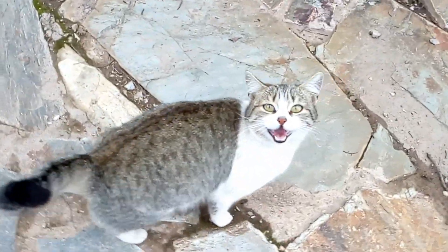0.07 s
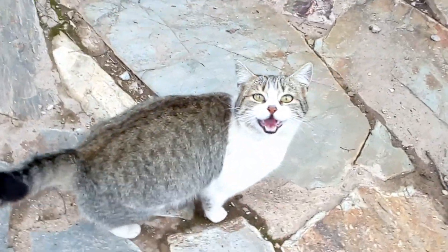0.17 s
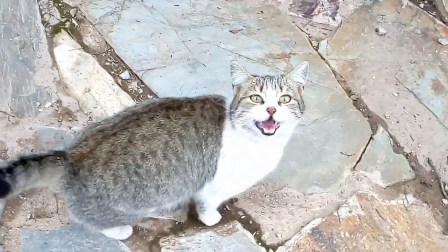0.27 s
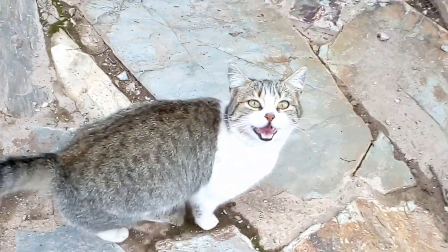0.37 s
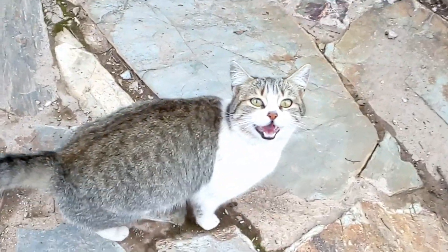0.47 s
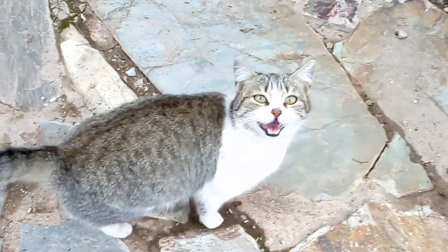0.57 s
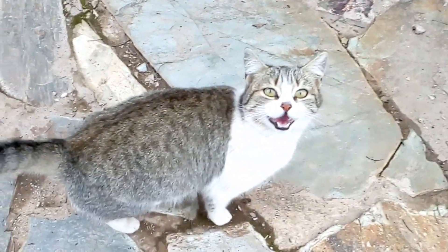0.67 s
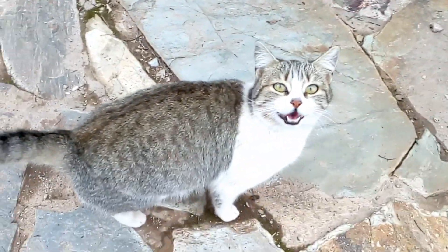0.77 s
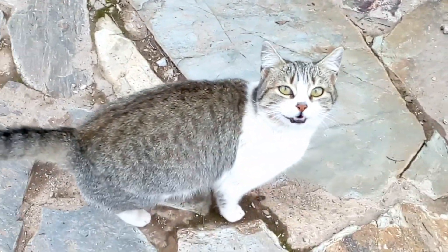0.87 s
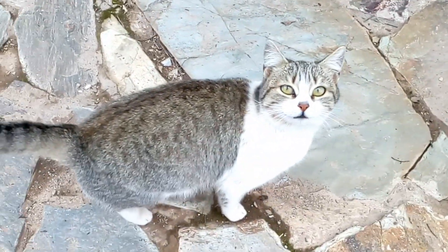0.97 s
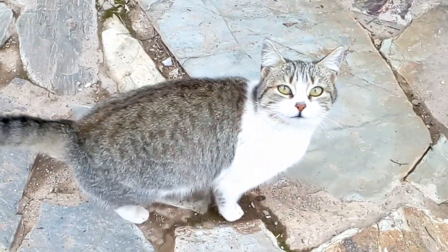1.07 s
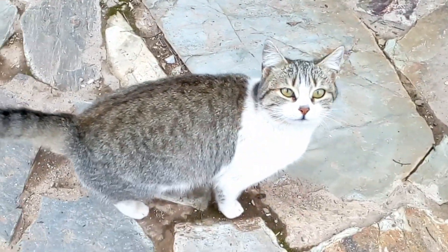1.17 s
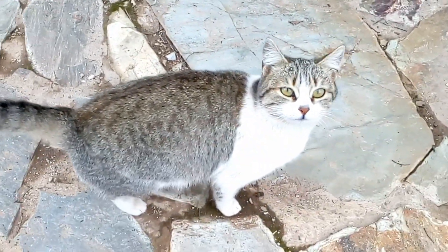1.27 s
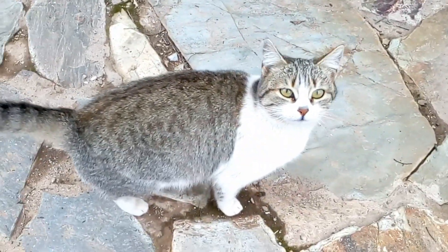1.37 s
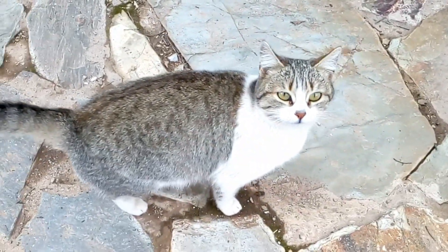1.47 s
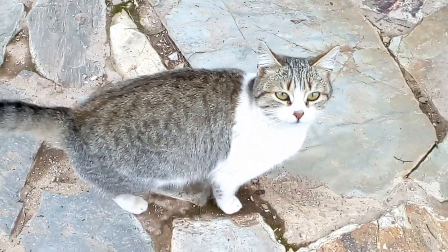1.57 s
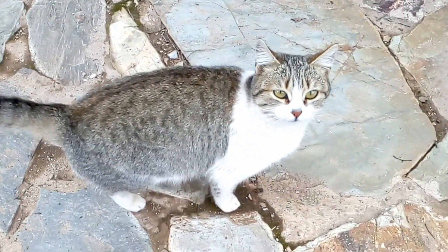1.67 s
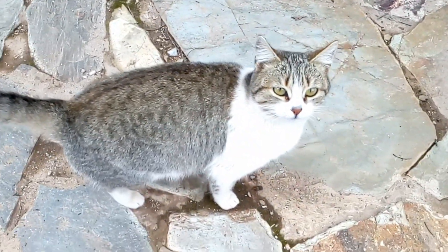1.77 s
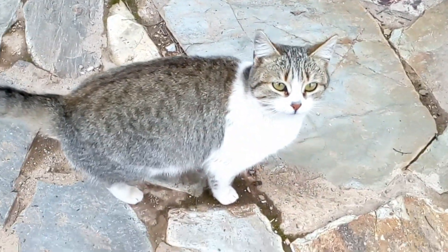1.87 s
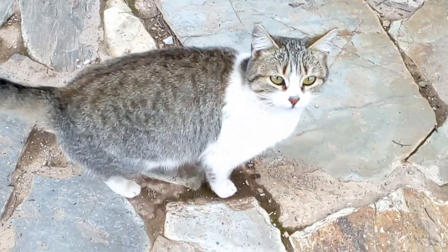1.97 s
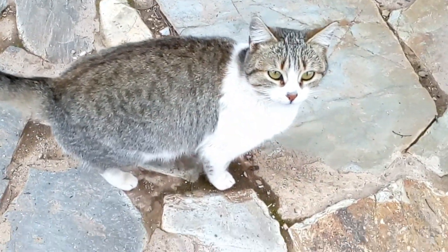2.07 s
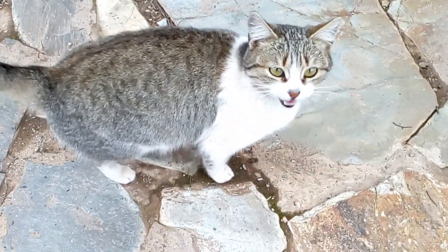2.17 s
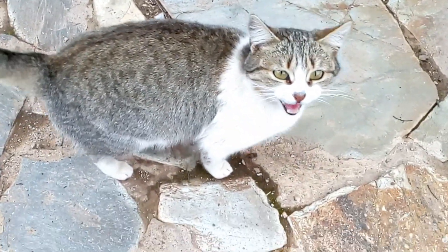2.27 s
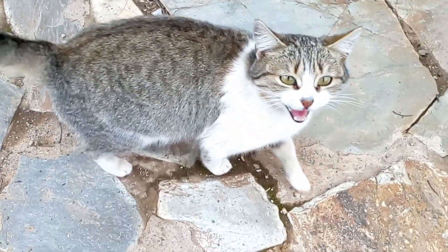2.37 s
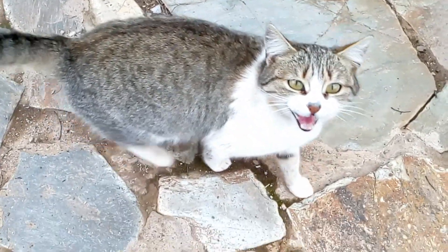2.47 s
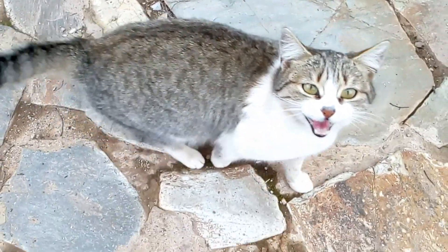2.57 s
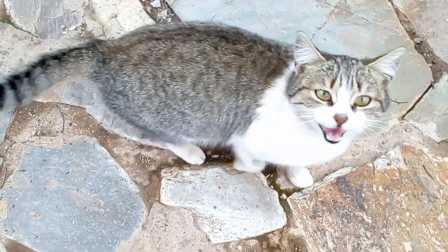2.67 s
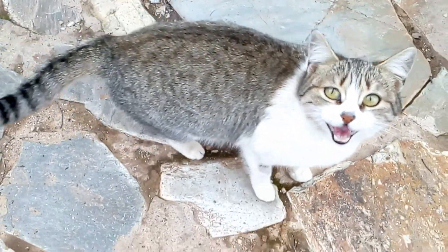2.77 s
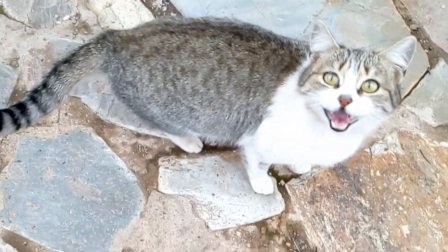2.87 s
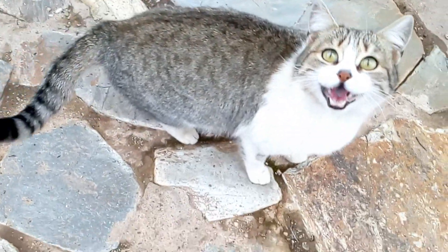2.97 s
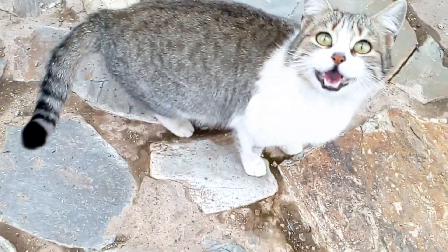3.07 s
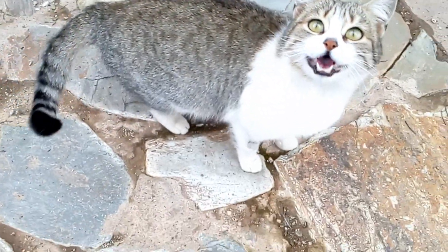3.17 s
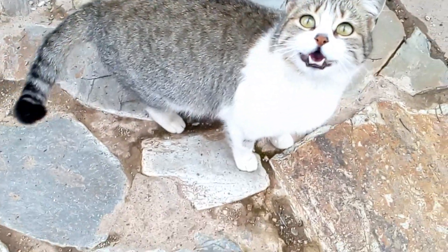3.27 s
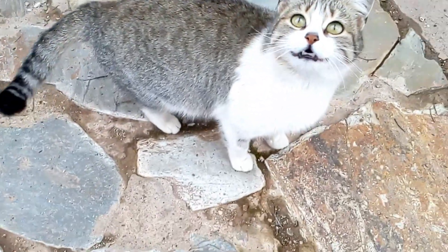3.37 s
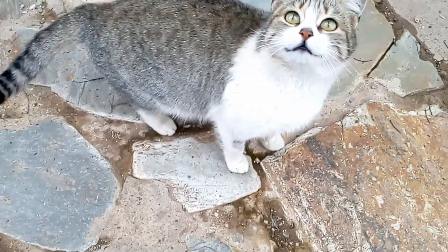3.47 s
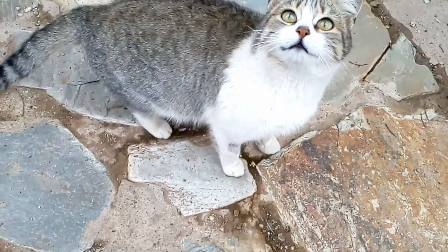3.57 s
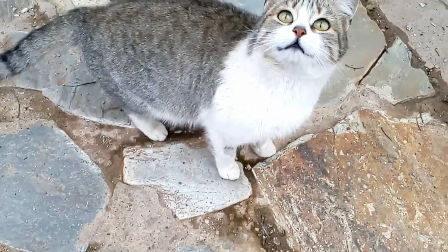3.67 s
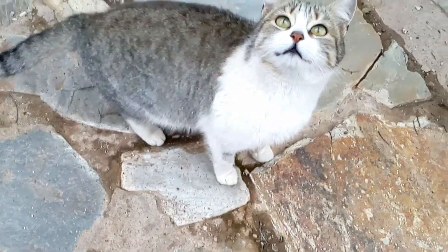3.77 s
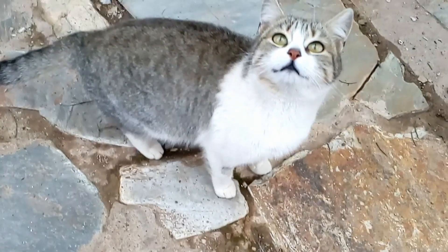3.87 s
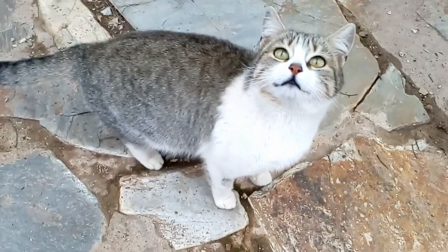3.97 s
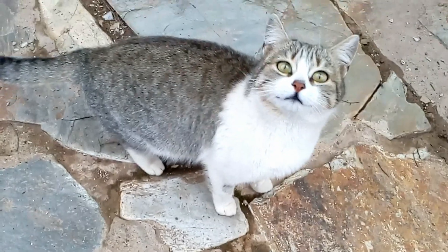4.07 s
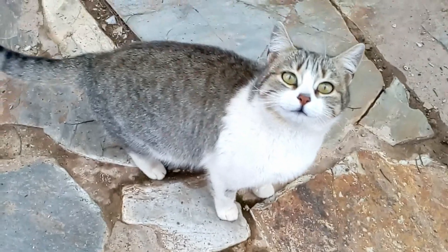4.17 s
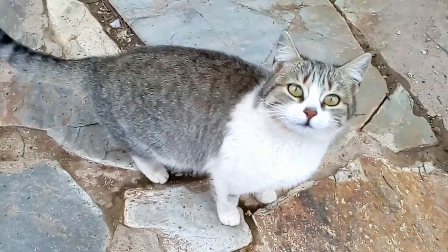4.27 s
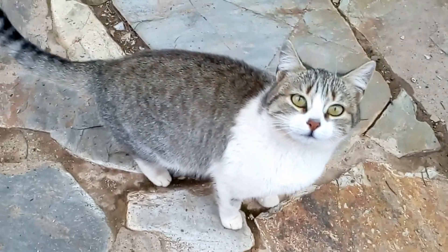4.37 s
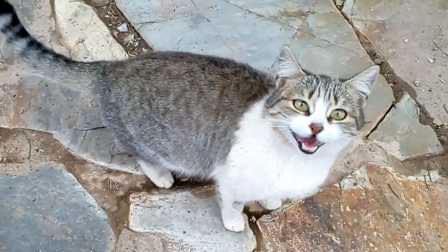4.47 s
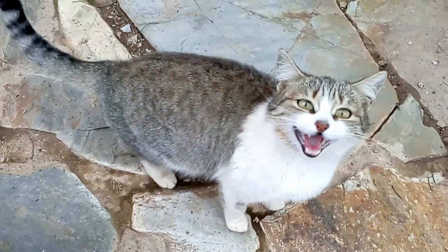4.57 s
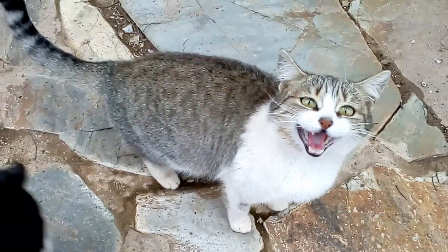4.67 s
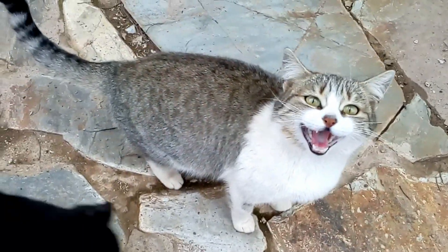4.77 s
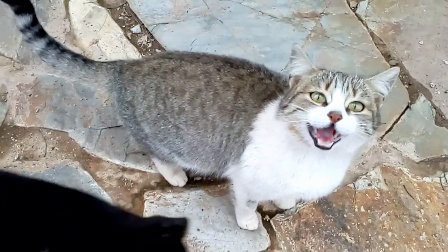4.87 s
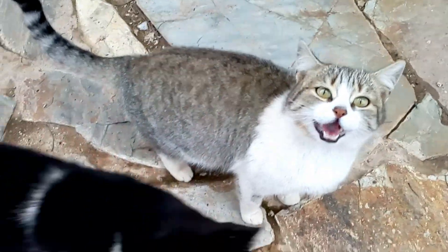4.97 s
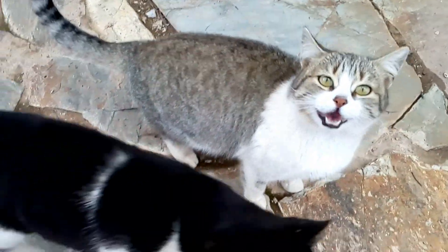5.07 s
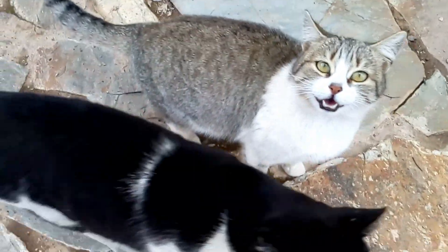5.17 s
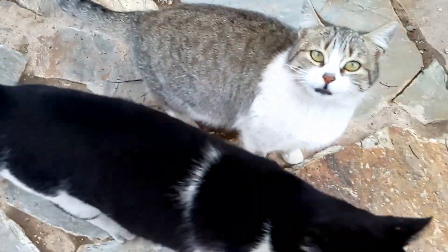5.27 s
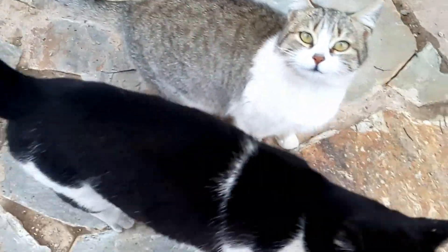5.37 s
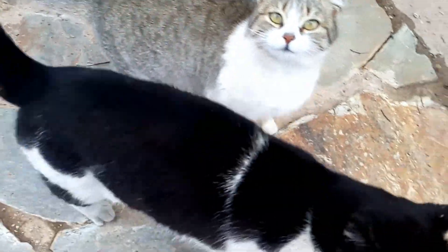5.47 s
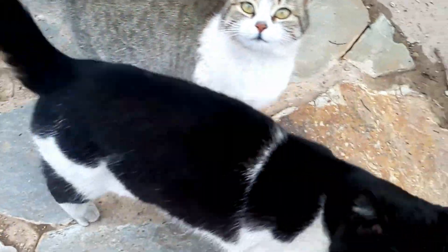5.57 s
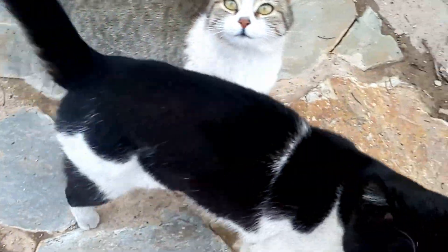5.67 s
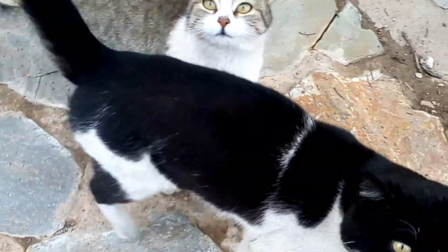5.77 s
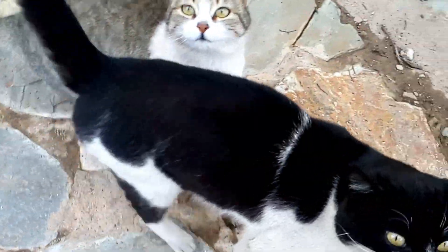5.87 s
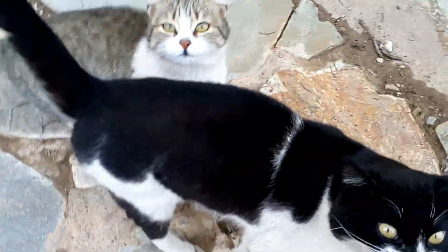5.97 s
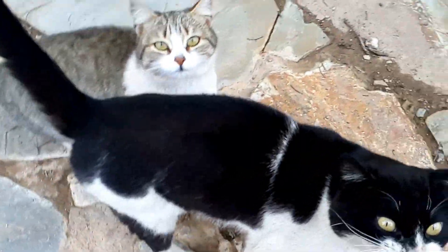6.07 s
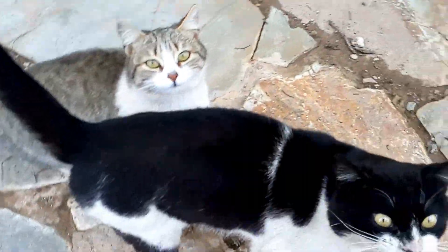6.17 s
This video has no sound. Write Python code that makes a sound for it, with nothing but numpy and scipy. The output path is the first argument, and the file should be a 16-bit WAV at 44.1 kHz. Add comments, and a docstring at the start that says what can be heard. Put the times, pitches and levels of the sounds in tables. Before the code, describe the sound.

A tabby cat gives three long insistent meows close by in a quiet stone-paved yard, while a second cat answers softly, then with a nearer meow.

```python
"""A quiet paved yard: a tabby gives three long meows close to the microphone; a second cat answers three times.
Fold pulses, built as harmonics, ring in throat shapes that blend as the jaws part and brighten the voice.
Each tabby meow ends in a short rough catch; a further catch comes just before the last answer.
Small resonant ticks and weak scattered echoes surround the cats.
Behind them lie shaped background noise, a faint high whine and a brief low drone, both of narrow noise."""
import sys
import numpy as np
from scipy import signal
from scipy.fft import rfft, irfft, next_fast_len
from scipy.io import wavfile
from scipy.ndimage import uniform_filter1d

SR = 44100
rng = np.random.default_rng(int(sys.argv[2]) if len(sys.argv) > 2 else 0)


def generate_wav(signal):
    """Clip the signal to [-1, 1] and save it as 16-bit WAV at the path in sys.argv[1]."""
    frames = np.transpose(np.atleast_2d(signal))
    scaled = np.clip(frames, -1, 1) * 32767
    pcm = np.round(scaled).astype(np.int16)
    wavfile.write(sys.argv[1], SR, pcm)


N = 274292
TIME = np.arange(N) / SR
EDGE_HZ = 15500  # upper limit of the whole sound

# tabby's throat resonances, jaws shut, parted and wide: frequency_hz, relative_level_db
NASAL_THROAT = [(480, 2.5), (1000, 2.5), (1500, -8), (2000, -7), (2900, 5), (3600, -12), (4500, -28),
                (6200, -27), (7200, -24), (10000, -72), (13000, -83)]
PARTED_THROAT = [(550, -24), (1100, -23.5), (1700, -35.5), (2200, -34.5), (2900, -16), (3500, 1.5),
                 (4050, 0), (4600, -1), (5200, 11.5), (6000, 4), (6700, -7), (7700, -18.5), (10000, -53),
                 (13000, -70)]
WIDE_THROAT = [(600, -11.5), (1200, -2), (1800, -1), (2430, 3), (3000, -10.5), (3650, -7), (4300, -18.5),
               (4900, -26.5), (5500, -11.5), (6100, 2), (6800, 6.5), (7450, -15.5), (8200, -39),
               (9700, -32.5), (13000, -92)]
# second cat's throat resonances, shut, open and harsh: frequency_hz, relative_level_db
ANSWER_SHUT_THROAT = [(700, 16), (1400, 10.5), (2080, -12.5), (2780, -11), (3500, -29.5), (4300, -34),
                      (5100, -12.5), (5800, -23.5), (6600, -19), (7500, -43.5), (11000, -77)]
ANSWER_OPEN_THROAT = [(700, -18), (1380, -23), (2080, 0), (2750, 8), (3450, -1.5), (4150, -10.5),
                      (4900, -18.5), (5600, -17), (6200, -18.5), (7200, -40), (11000, -60)]
ANSWER_HARSH_THROAT = [(550, -17), (1100, -12), (1700, -10), (2300, 1.5), (2900, -4), (3500, -11.5),
                       (4100, -23), (5200, -19), (7000, -38), (11000, -62)]
# second cat's jaw: time_s, position (0 shut, 1 open, 2 and above harsh)
ANSWER_JAW_CURVE = [(3.94, 3.4), (4.1, 0.57), (4.2, 0.048), (4.7, .1), (5.85, 2.6), (5.94, 2),
                    (5.951, 0.89)]
# second cat's hoarseness: time_s, harmonic_scatter (0-1)
ANSWER_HOARSE_CURVE = [(4.0, 0), (4.09, 0.6), (4.14, 0.14), (5.89, 0), (5.897, 0.53), (5.922, 0.3),
                       (5.936, 0.18), (6.22, 0.11)]
# catches of the throat: start_s, level_db (before the swell), pitch_hz (partway through its sag)
THROAT_CATCHES = [(0.889, -37, 463), (3.38, -38.5, 483), (5.306, -38, 453), (5.806, -44, 430)]
# throat resonances during a catch: frequency_hz, relative_level_db
CATCH_THROAT = [(450, 3.5), (950, -0.5), (1500, -12.5), (2400, -16), (4000, -15), (5200, -19.5),
                (6800, -17), (8500, -33.5), (13000, -84)]
# small ticks of lips and paws: start_s, level_db (port mean, before the envelope), centre_hz, width_hz, decay_s
LIP_AND_PAW_TICKS = [(0.122, -47, 900, 1853, 0.0054), (.698, -46.5, 500, 1201, 0.0067),
                     (0.73, -49, 900, 1868, 0.011), (1.46, -55, 3000, 2500, .003),
                     (3.987, -38.5, 5480, 1000, 0.0023), (4.181, -42.5, 6430, 700, 0.0047),
                     (5.801, -46.5, 4400, 2220, .004), (5.815, -52, 2950, 404, 0.019)]
# low drone's level over time: time_s, level_db
DRONE_LEVEL = [(3.55, -77), (3.61, -65), (3.95, -67), (4.03, -95)]
# colour of the background noise, with a faint high hiss at 14-15.5 kHz: frequency_hz, relative_level_db
BACKGROUND_COLOUR = [(15, -31), (25, -23), (62, -0.5), (148, 1.5), (331, -3.5), (482, -7), (666, -8),
                     (722, -8), (1270, -11), (1450, -12.5), (4260, -15), (5580, -16), (6050, -10),
                     (7500, -24), (13600, -26.5), (14600, -16.5), (15500, -17)]
# bands of the high whine: centre_hz, width_hz, level_db (mean of the ports)
WHINE_BANDS = [(6185, 19, -72), (9340, 48, -84.5)]
# left minus right for the tabby, the answers from the side and the near answer: frequency_hz, difference_db
TABBY_BALANCE = [(600, 0), (2400, -1.5), (3700, -2.5), (5000, -2.5), (6200, -5), (7200, -11), (10000, -24)]
ANSWER_BALANCE = [(700, 1), (1400, 8), (2100, -5.5), (3000, -10), (7000, -9.5)]
NEAR_ANSWER_BALANCE = [(700, 1), (2100, 1.5), (2800, 0), (4200, 2), (5500, -2), (7000, -1)]
# pitch of the tabby's three meows, before tremble and jitter: time_s, pitch_hz
MEOW_PITCH_1 = [(0.0, 606.5), (0.142, 615.4), (0.288, 604.6), (0.324, 593.3), (0.578, 599.2), (0.826, 587),
                (0.878, 565.5), (0.885, 585)]
MEOW_PITCH_2 = [(2.228, 408), (2.256, 388.4), (2.278, 488), (2.288, 510), (2.306, 496.6), (2.332, 517.7),
                (2.434, 568.5), (2.572, 617.4), (2.926, 629.2), (3.0, 627), (3.184, 594.5), (3.366, 575),
                (3.375, 570)]
MEOW_PITCH_3 = [(4.522, 476), (4.54, 427.5), (4.554, 399.4), (4.582, 432.1), (4.606, 433.5), (4.616, 440),
                (4.624, 456), (4.752, 525), (4.96, 633.8), (5.14, 607), (5.303, 573)]
# jaw moves of the three meows, the first already under way, and level offsets:
# part_start_s, parting_s, widen_start_s, parted_ring_db, wide_low_db, wide_ring_db, wide_edge_db
MEOW_MOVES = [(-.5, .05, -0.04, 0, -4, -3.5, -6.5), (2.328, 0.044, 2.5, 0, 0.5, -0.5, 1),
              (4.564, 0.077, 4.895, 5, -0.8, -3, -6.5)]
# pitch of the second cat's chirp, side call and near meow, before jitter: time_s, pitch_hz
CHIRP_PITCH_CURVE = [(3.94, 488), (3.995, 552), (4.03, 514)]
SIDE_PITCH_CURVE = [(4.078, 605), (4.118, 608), (4.126, 626), (4.226, 678), (4.368, 682), (4.44, 728.5),
                    (4.682, 717.5), (4.696, 669), (4.71, 641.7)]
NEAR_PITCH_CURVE = [(5.852, 527), (5.886, 593), (5.916, 554), (5.932, 623), (5.98, 681), (6.03, 669),
                    (6.126, 694.6), (6.212, 692), (6.219, 670)]
# the second cat's three calls: low_db, ring_db, edge_db (all before swell, throb and fade),
# swell_s, fade_s, ring_throb_db, left_lead_s
ANSWER_CALLS = [(-58, -68.5, -79, 0.034, 0.047, 5, -.00036),
                (-54.5, -46.5, -53.5, 0.33, 0.16, 5.5, -.00036),
                (-47.5, -36.5, -56, 0.032, 0.0016, 0.5, .00004)]
# stretches in which harmonics near 3 kHz flicker between the ears: start_s, end_s
FLICKER_STRETCHES = [(.34, 0.67), (2.46, 2.5), (2.66, 2.94), (3.209, 3.34)]

# the tabby's voice at each stage, before offsets and effort:
# jaw (0 shut, 1 parted, 2 wide), low_db, ring_db (near 3 kHz), edge_db (near 6 kHz), hoarseness (0-1)
WHEN_SHUT = (0.45, -46, -48.5, -67.5, 0.24)
WHEN_PARTED = (1.43, -49.5, -34, -38.5, 0.19)
WHEN_WIDE = (1.78, -45, -37.5, -38.5, 0.1)
# every triple of dB below runs low, ring, edge
WIDENING_S, WIDENING_HOARSE = 0.1, 0.082  # the voice cracks a little as the jaws open wide
EASY_HZ, EFFORT_DB_PER_OCTAVE = 604, (10.5, 23.5, 8.5)  # higher is louder
RELEASE_S, RELEASE_DB = 0.19, (-1.5, -8.5, -7)  # the meow runs out
SLUMP_AFTER_S, SLUMP_S, SLUMP_DB = 0.07, 0.037, (0.5, -7.5, -4)  # a brief slump once the jaws start to widen
GATHER_S, GATHER_DB = 0.12, -7  # the voice gathers strength before the jaws part
TREMBLE, TREMBLE_HZ = .004, 21.7  # share of the pitch, fading out as the jaws open wide
SWELL_DB, FADE_DB = (-9.5, -6.5, -30), (-2.5, -26, -26)  # at the very start and end of an answer
THROB_HZ, THROB_DECAY_S = 10.16, 0.42  # the ring throbs at first, then steadies
BREAK_AT_S, BREAK_S, BREAK_DB = 5.937, 0.012, -14  # ring dip as the harsh start breaks into a clear tone
FLICKER_HOLD_S, FLICKER_SHARE, FLICKER_RADIANS = .02, .33, 2.69


def amp(db):
    """Turns dB into amplitude."""
    return 10 ** (np.asarray(db) / 20)


def evened(x):
    """Brings a signal to unit RMS."""
    return x / np.sqrt(np.mean(abs(x) ** 2) + 1e-20)


def read(points, hz):
    """Reads a spectrum joined by straight lines over log frequency."""
    f, value = np.transpose(points)
    return np.interp(np.log(hz + 1), np.log(f + 1), value)


def follow(rows, t):
    """Reads a control curve at the times t."""
    return np.interp(t, *np.transpose(rows))


def ramp(t, start, length):
    """Rises from 0 to 1 over the given length."""
    return np.clip((t - start) / length, 0, 1)


def add(mix, start_s, sound):
    """Lays a sound into the mix, cut off at its end."""
    part = mix[:, max(round(start_s * SR), 0):][:, :sound.shape[-1]]
    part += sound[..., :part.shape[1]]


def waver(size, rate_hz):
    """Smooth random drift of unit RMS, slower than about rate_hz."""
    padded = next_fast_len(size)
    f = np.fft.rfftfreq(padded, 1 / SR)
    spectrum = rfft(rng.standard_normal(padded)) / (1 + (f / rate_hz) ** 4)
    return evened(irfft(spectrum, padded)[:size])


def band(size, hz, width_hz):
    """Unit-RMS noise in one resonance."""
    f = np.fft.rfftfreq(size, 1 / SR)
    spectrum = rfft(rng.standard_normal(size)) / (1 + (2 * (f - hz) / width_hz) ** 2)
    return evened(irfft(spectrum, size))


def background_hiss():
    """Soft background noise, shaped in colour, slightly wavering in level and unrelated in the two ports."""
    colour = amp(read(BACKGROUND_COLOUR, np.fft.rfftfreq(N, 1 / SR)))
    hiss = np.array([evened(irfft(rfft(rng.standard_normal(N)) * colour, N)) for port in range(2)])
    level_db = -59.5 + 0.14 * waver(N, 12)
    return hiss * amp(level_db) * amp([[-.5], [.5]])


def whine():
    """Thin high whine: narrow noise bands, unrelated in the two ports and stronger on the right."""
    ports = [sum(amp(db) * band(N, hz, width_hz) for hz, width_hz, db in WHINE_BANDS) for port in range(2)]
    return np.array(ports) * amp([[-2], [2]])


def throat(shape, hz):
    """Log gain and phase lag of a throat shape: it rings after each pulse, never before."""
    f = np.fft.fftfreq(2048, 1 / SR)
    log_gain = np.log(amp(read(shape, abs(f))))
    response = np.conj(signal.hilbert(log_gain))  # minimum phase
    return np.interp(hz, f[f >= 0], response[f >= 0])


def harmonics(pitch, hoarse, jitter=0.0023, scatter_hz=260, tilt=0.8):
    """Vocal-fold pulses as rotating harmonics; hoarseness unsteadies them and smears the high ones most."""
    size = len(pitch)
    unsteady_pitch = pitch * (1 + (jitter + 0.027 * hoarse) * waver(size, 98))
    turns = np.cumsum(unsteady_pitch) / SR
    for k in range(1, int(EDGE_HZ * .75 / pitch.mean())):
        smear = waver(size, scatter_hz) + 1j * waver(size, scatter_hz)
        scatter = hoarse * smear * (k / 10) ** tilt
        yield k * pitch, np.exp(2j * np.pi * k * turns) * (1 + scatter)


def flicker(t, hz, centre_hz=3050, width_hz=620):
    """Phase between the ports: harmonics near 3 kHz jump out of step at random and return abruptly."""
    slot = ((t - t[0]) / FLICKER_HOLD_S).astype(int)
    jumped = (rng.random(size=256) < FLICKER_SHARE)[slot % 256]
    inside = sum((t > start) & (t < end) for start, end in FLICKER_STRETCHES)
    near = 1 / (1 + ((hz - centre_hz) / width_hz) ** 8)
    return uniform_filter1d(FLICKER_RADIANS * jumped * inside * near, size=120)


def meow(t, pitch, levels_db, jaw, hoarse, shapes, balance, ring_hz, jitter, left_lead_s,
         edge_hz=4750, shimmer_db=2.0, rasp_db=-22.0):
    """Fold pulses pass a throat that changes with the jaw; its low, ring and edge regions have own levels."""
    opening = np.clip(jaw, 0, len(shapes) - 1)
    blend = [np.maximum(1 - abs(opening - i), 0) for i in range(len(shapes))]
    regions, power = np.zeros((3, 2, len(t))), np.zeros((3, len(t)))
    for hz, wave in harmonics(pitch, hoarse, jitter):
        gain = np.exp(sum(b * throat(shape, hz) for b, shape in zip(blend, shapes)))
        gain *= amp(shimmer_db * waver(len(t), 14.8))
        # steep crossovers share each harmonic among the regions
        above_ring, above_edge = (1 / (1 + (corner / hz) ** 24) for corner in (ring_hz, edge_hz))
        share = np.array([1 - above_ring, above_ring - above_edge, above_edge])
        # half the level and phase difference goes to each port; the sound reaches one port first
        half_phase = np.pi * hz * left_lead_s + flicker(t, hz) / 2
        lean = amp(read(balance, hz) / 2) * np.exp(1j * half_phase)
        partial = gain * wave
        regions += share[:, None] * np.array([(partial * lean).real, (partial / lean).real])
        power += share * abs(gain) ** 2 / 2
    # each region of the throat is driven to its own level
    drive = amp(levels_db) / np.sqrt(uniform_filter1d(power, size=900) + 1e-12)
    voice = (regions * drive[:, None]).sum(0)
    # air hisses through the folds once in every cycle and veils the high harmonics
    puffs = 1 + np.cos(2 * np.pi * np.cumsum(pitch) / SR)
    rasp = amp(levels_db[-1] + rasp_db) * puffs * band(len(t), 6070, 1300) * amp([[-2], [2]])
    fade = np.clip(np.minimum(t - t[0], t[-1] - t) / .004, 0, 1)
    return t[0], (voice + rasp) * fade


def tabby():
    """Three long meows: jaws go from shut to parted to wide; louder as pitch climbs, running out at the end."""
    out = np.zeros((2, N))
    stages = np.transpose([WHEN_SHUT, WHEN_PARTED, WHEN_WIDE])
    for curve, moves in zip((MEOW_PITCH_1, MEOW_PITCH_2, MEOW_PITCH_3), MEOW_MOVES):
        part_at, part_s, wide_at, parted_ring_db, *wide_db = moves
        t = np.arange(curve[0][0], curve[-1][0], 1 / SR)
        parted, wide = ramp(t, part_at, part_s), ramp(t, wide_at, WIDENING_S)
        pitch = follow(curve, t) * (1 + TREMBLE * (1 - wide) * waver(len(t), TREMBLE_HZ))
        jaw, *levels_db, hoarse = stages @ [1 - parted, parted - wide, wide]
        levels_db = np.array(levels_db) + np.outer(wide_db, wide)
        levels_db += GATHER_DB * (1 - ramp(t, part_at - GATHER_S, GATHER_S)) ** 2
        levels_db[1] += parted_ring_db * (parted - wide)
        levels_db += np.outer(SLUMP_DB, np.exp(-((t - wide_at - SLUMP_AFTER_S) / SLUMP_S) ** 2))
        levels_db += np.outer(EFFORT_DB_PER_OCTAVE, np.log2(pitch / EASY_HZ))
        levels_db += np.outer(RELEASE_DB, ramp(t, t[-1] - RELEASE_S, RELEASE_S) ** 2)
        hoarse = hoarse + WIDENING_HOARSE * np.sin(np.pi * wide ** 2)
        shapes = (NASAL_THROAT, PARTED_THROAT, WIDE_THROAT)
        add(out, *meow(t, pitch, levels_db, jaw, hoarse, shapes, TABBY_BALANCE,
                       ring_hz=2125, jitter=0.0011, left_lead_s=.00001))
    return out


def yard(x, t60=0.19, dull_hz=5000):
    """Weak scattered echoes from paving and walls: sparse, dulled random taps that die away."""
    t = np.arange(SR // 2) / SR
    sparse = rng.standard_normal((2, len(t))) * (rng.random((2, len(t))) < .06)
    taps = sparse * amp(-60 * t / t60) * (t > .004)
    taps = signal.lfilter(*signal.butter(1, min(dull_hz, SR / 3), fs=SR), taps)
    return signal.fftconvolve(x, taps / np.linalg.norm(taps[0]), axes=1)[:, :N]


def ticks(rise_s=0.00033):
    """Brief smacks and scuffs, each a noise burst dying in one resonance."""
    out, t = np.zeros((2, N)), np.arange(SR // 10) / SR
    for start_s, db, hz, width_hz, decay_s in LIP_AND_PAW_TICKS:
        envelope = (1 - np.exp(-t / rise_s)) * np.exp(-t / decay_s)
        add(out, start_s, amp(db) * band(len(t), hz, width_hz) * envelope)
    return out * amp([[-1], [1]])


def catches(hold_s=0.013, sag_per_s=3.5, hoarse=1.0):
    """The folds go slack and flap a few more times, low and rough."""
    out, t = np.zeros((2, N)), np.arange(SR // 20) / SR
    swell = (1 - np.exp(-t / 0.0036)) * np.exp(-(t / hold_s) ** 2)
    for start_s, db, pitch_hz in THROAT_CATCHES:
        pitch = pitch_hz * np.exp(-sag_per_s * (t - hold_s / 2))
        flap = sum((np.exp(throat(CATCH_THROAT, hz)) * wave).real for hz, wave in harmonics(pitch, hoarse))
        add(out, start_s, amp(db) * swell * evened(flap))
    return out


def drone():
    """Brief faint low drone: one noise resonance, the same in both ports."""
    return amp(follow(DRONE_LEVEL, TIME)) * band(N, 464, 120)


def second_cat():
    """Chirp and nearly shut-mouthed call from the side, then a near meow that starts harshly; all swell and fade."""
    out = np.zeros((2, N))
    shapes = (ANSWER_SHUT_THROAT, ANSWER_OPEN_THROAT, ANSWER_HARSH_THROAT)
    curves = (CHIRP_PITCH_CURVE, SIDE_PITCH_CURVE, NEAR_PITCH_CURVE)
    balances = (ANSWER_BALANCE, ANSWER_BALANCE, NEAR_ANSWER_BALANCE)
    for curve, balance, call in zip(curves, balances, ANSWER_CALLS):
        low_db, ring_db, edge_db, swell_s, fade_s, throb_db, left_lead_s = call
        t = np.arange(curve[0][0], curve[-1][0], 1 / SR)
        age = t - t[0]
        levels_db = np.outer(SWELL_DB, 1 - ramp(age, 0, swell_s))
        levels_db += np.outer(FADE_DB, ramp(t, t[-1] - fade_s, fade_s) ** 2)
        levels_db += [[low_db], [ring_db], [edge_db]]
        levels_db[1] -= throb_db * np.cos(2 * np.pi * THROB_HZ * age) * np.exp(-age / THROB_DECAY_S)
        levels_db[1] += BREAK_DB * np.exp(-((t - BREAK_AT_S) / BREAK_S) ** 2)
        jaw, hoarse = follow(ANSWER_JAW_CURVE, t), follow(ANSWER_HOARSE_CURVE, t)
        add(out, *meow(t, follow(curve, t), levels_db, jaw, hoarse, shapes, balance,
                       ring_hz=1690, jitter=0.0043, left_lead_s=left_lead_s))
    return out


def scene():
    """Both cats and the small ticks, their echoes, and the background hiss with its whine and drone."""
    cats = tabby() + ticks() + catches() + second_cat()
    return cats + amp(-16.5) * yard(cats) + background_hiss() + whine() + drone()


def record(dry):
    """The recorder's band limit: a steep low-pass."""
    low_pass = signal.firwin(511, EDGE_HZ, window=("kaiser", 9), fs=SR)
    return signal.oaconvolve(dry, low_pass[None], "same")


dry = scene()
out = record(dry)
generate_wav(out)
```